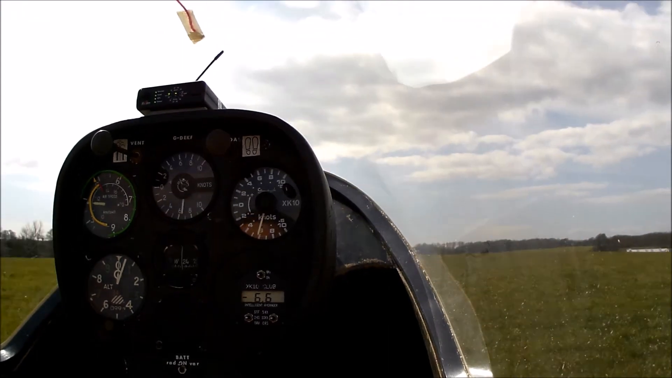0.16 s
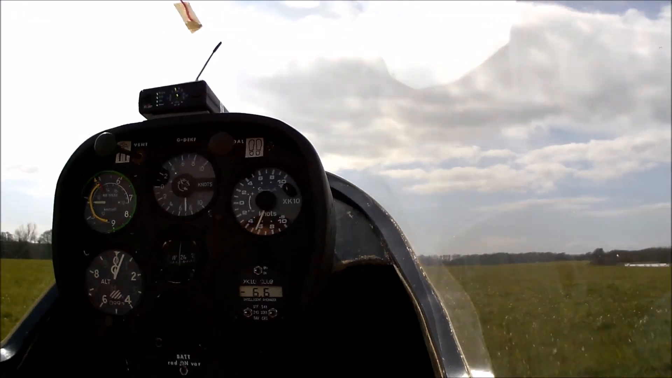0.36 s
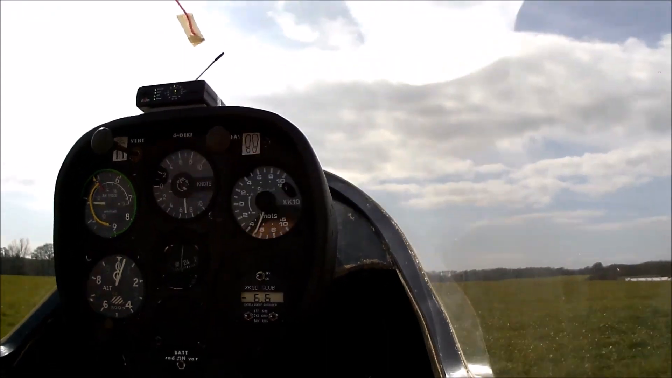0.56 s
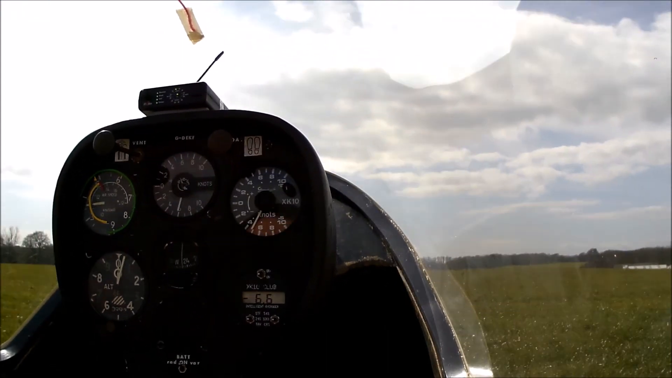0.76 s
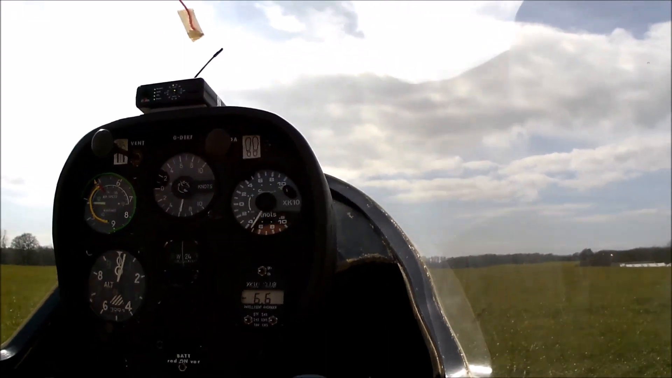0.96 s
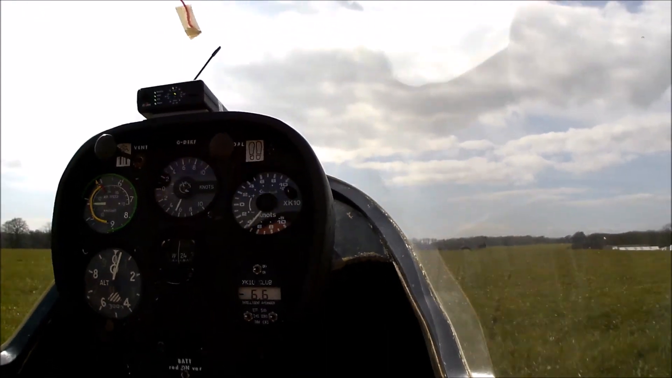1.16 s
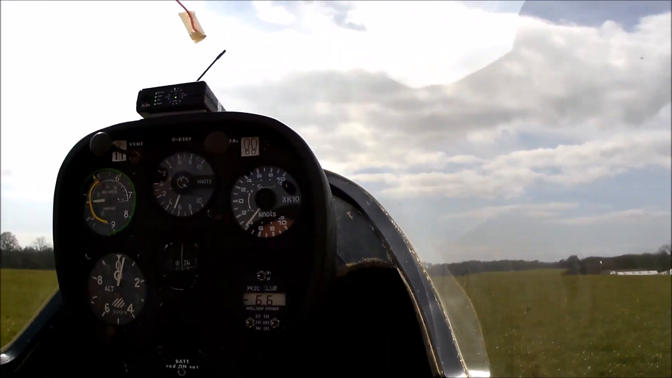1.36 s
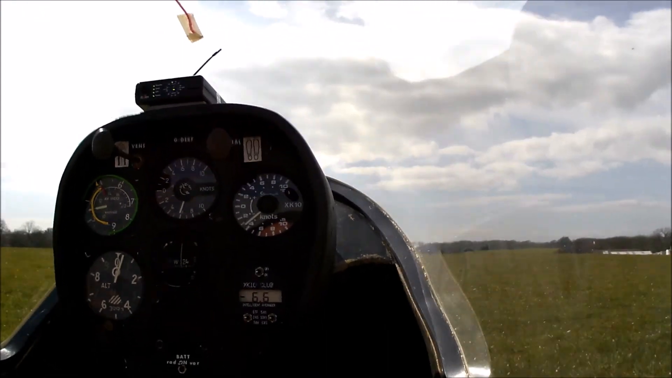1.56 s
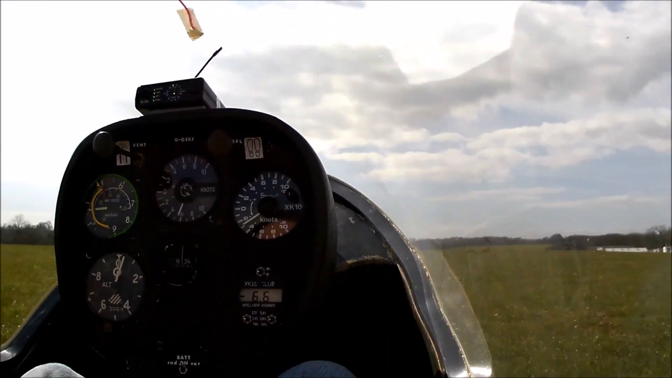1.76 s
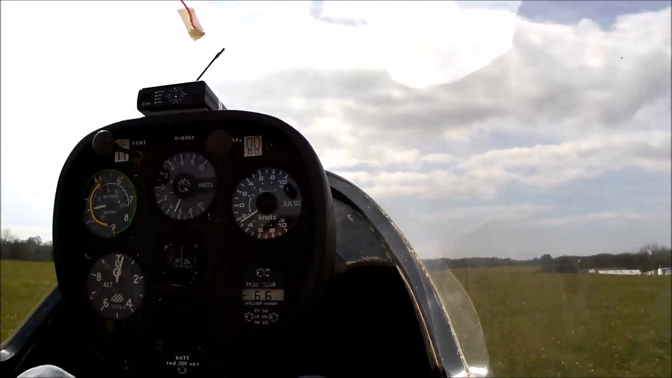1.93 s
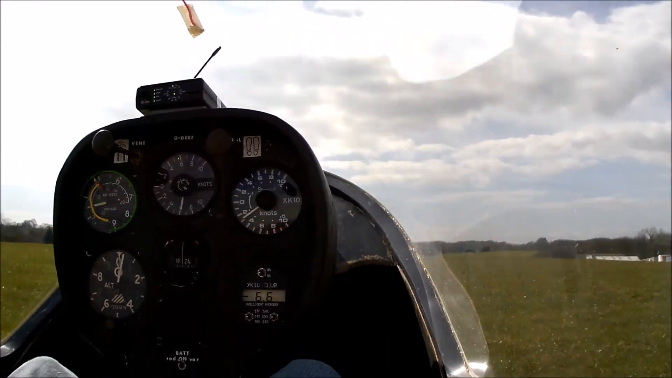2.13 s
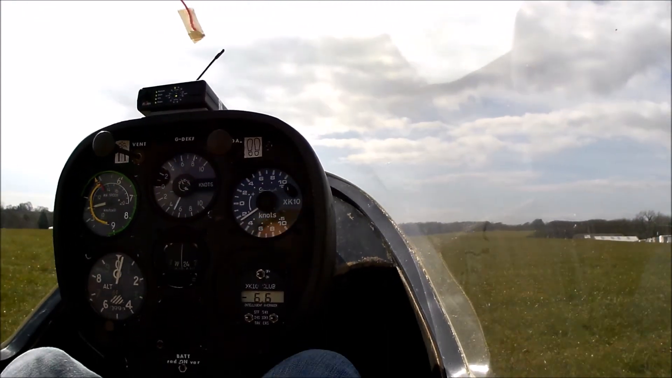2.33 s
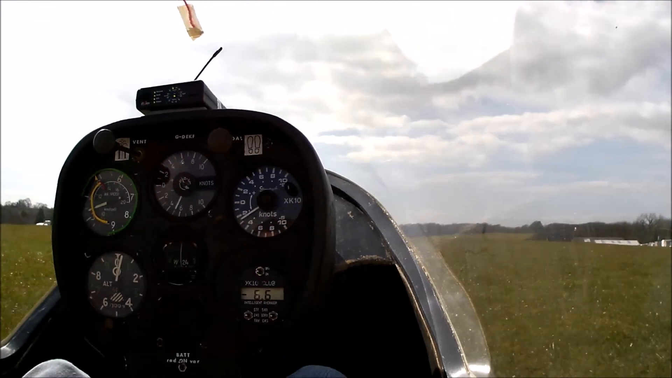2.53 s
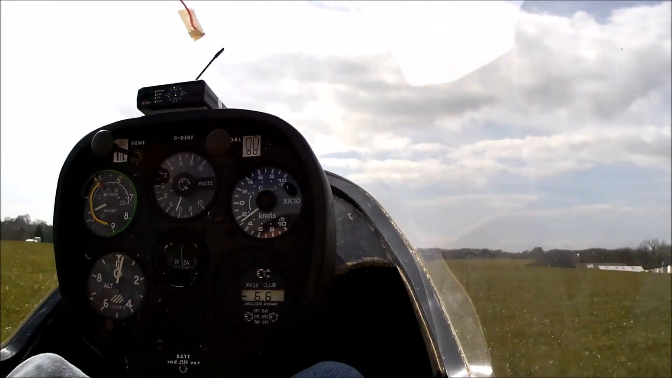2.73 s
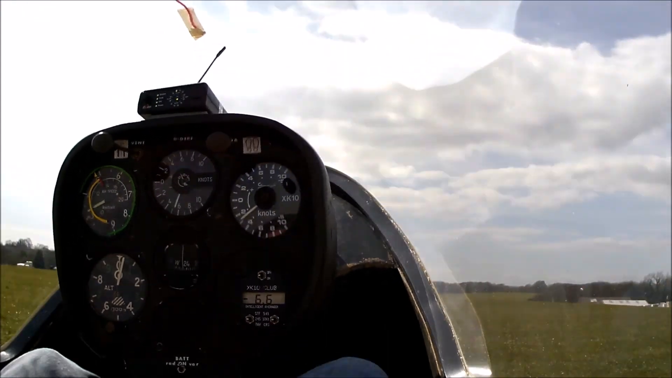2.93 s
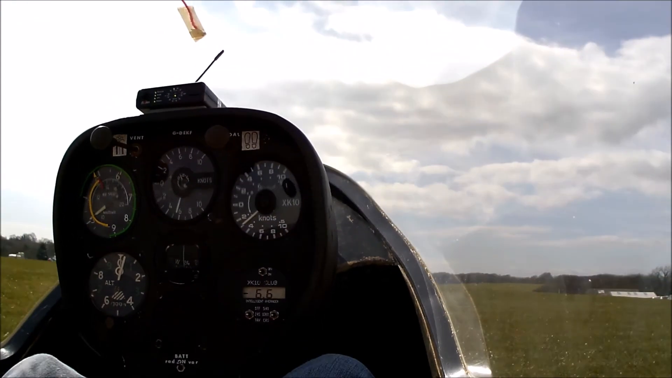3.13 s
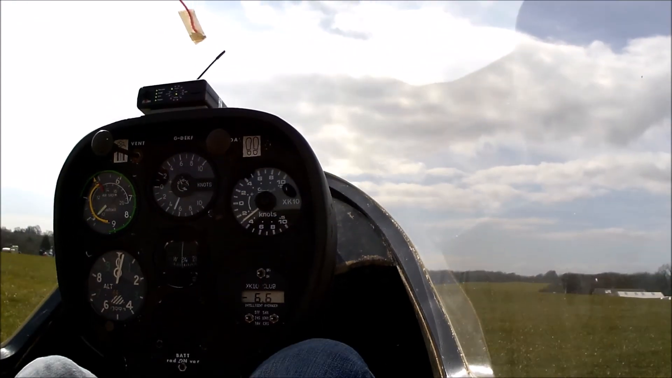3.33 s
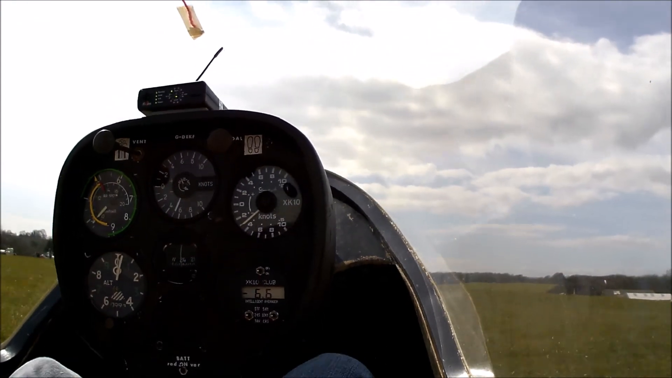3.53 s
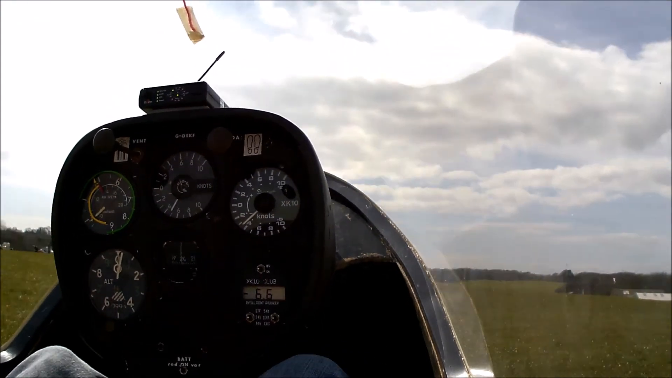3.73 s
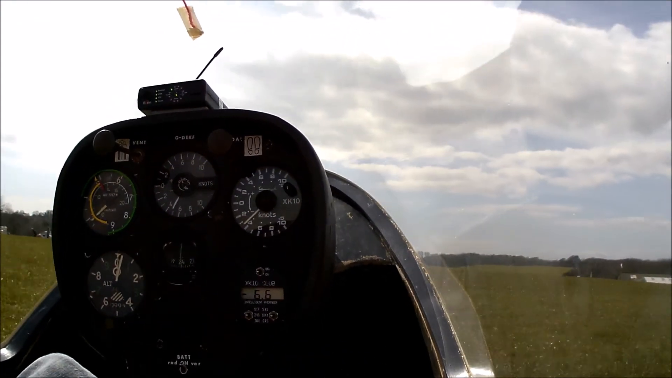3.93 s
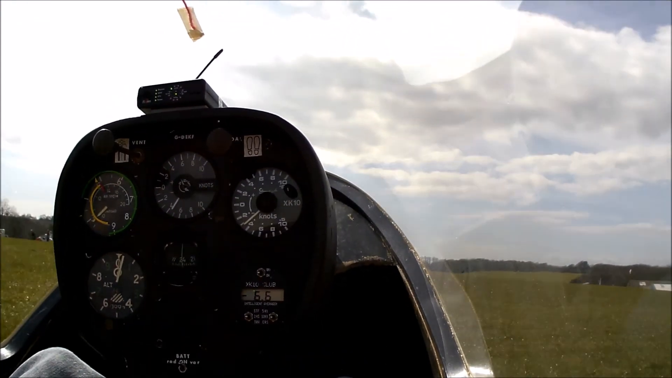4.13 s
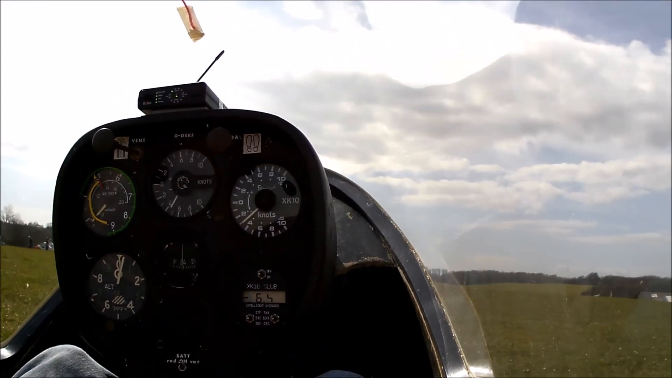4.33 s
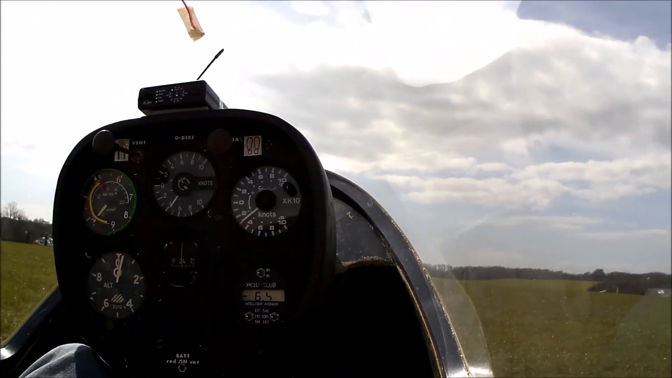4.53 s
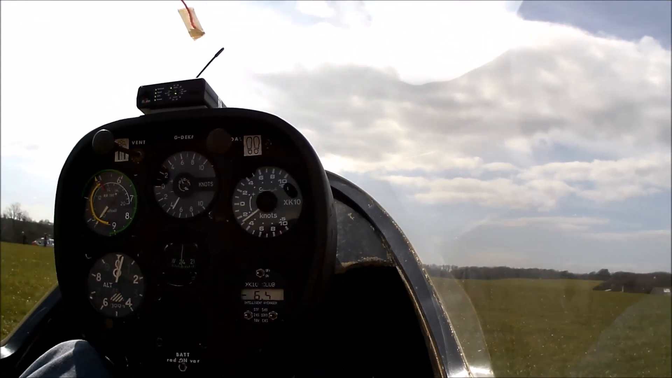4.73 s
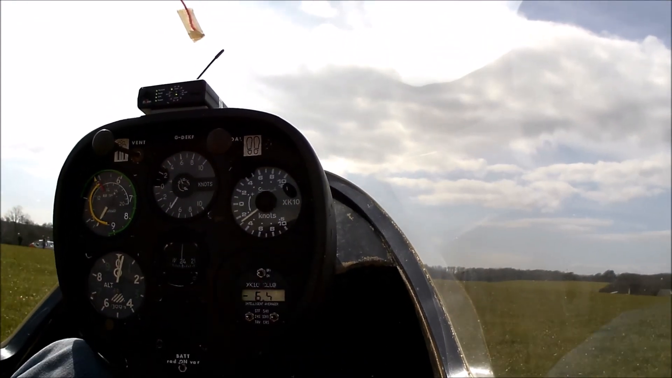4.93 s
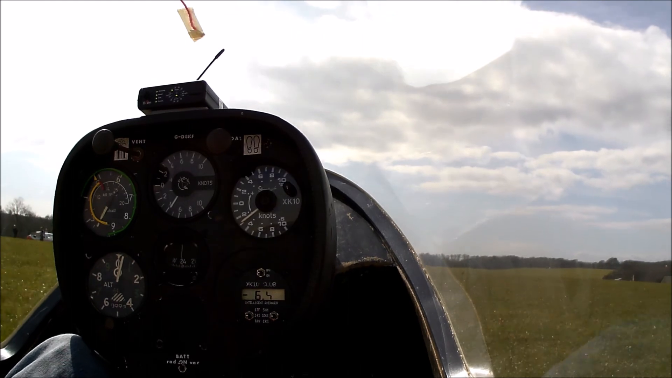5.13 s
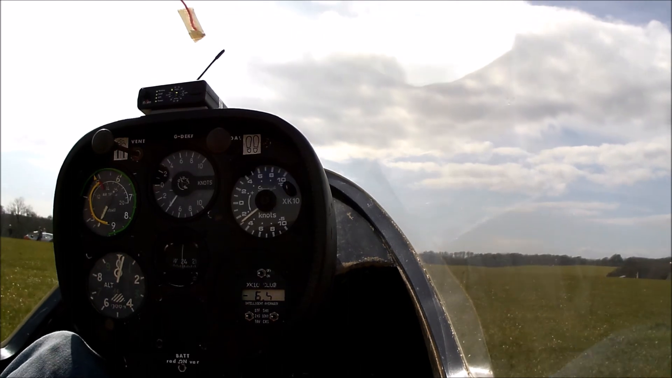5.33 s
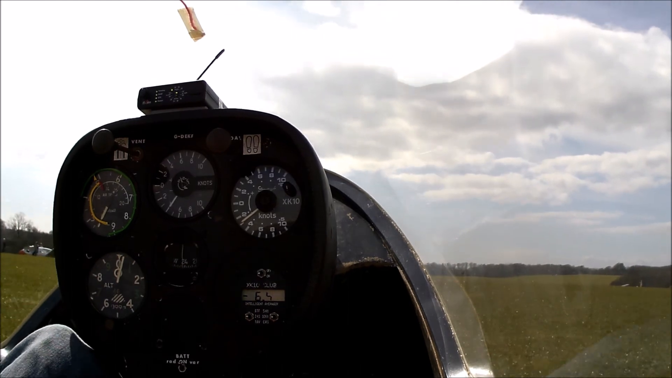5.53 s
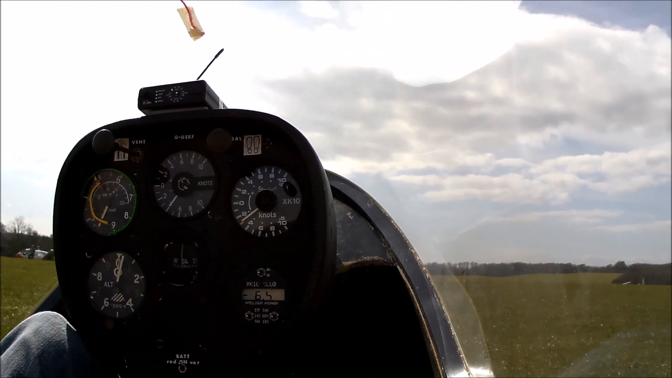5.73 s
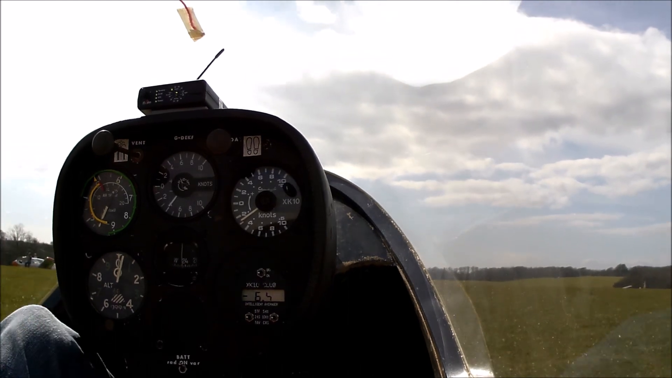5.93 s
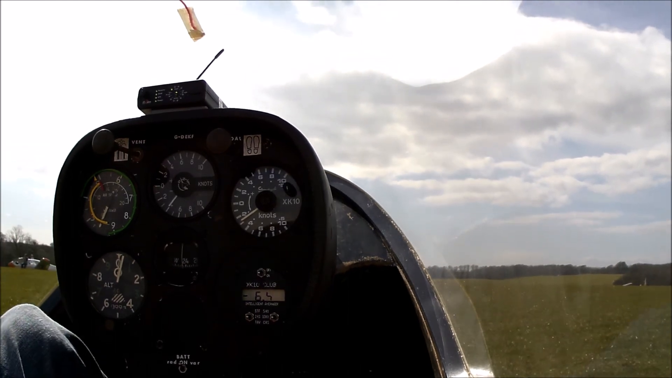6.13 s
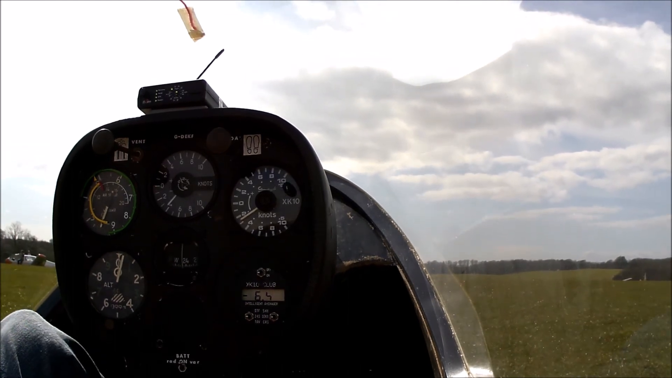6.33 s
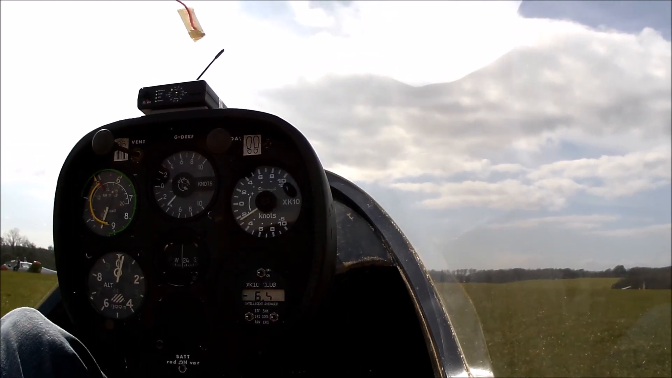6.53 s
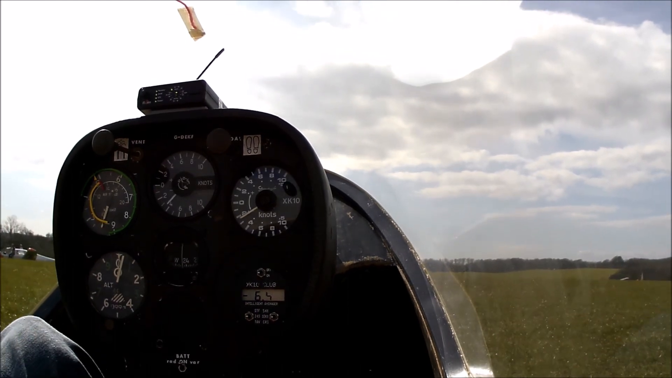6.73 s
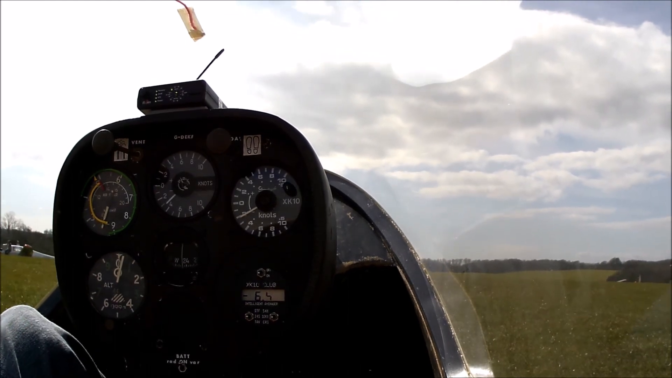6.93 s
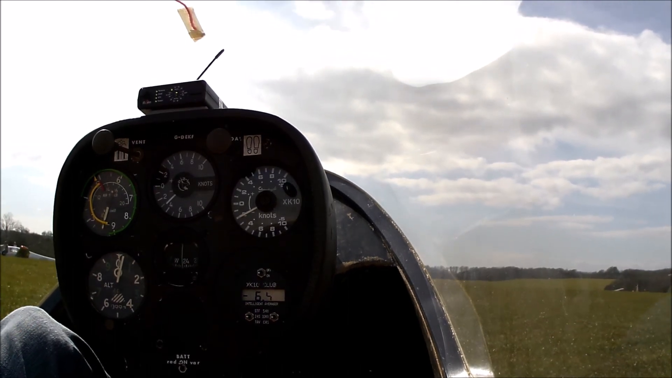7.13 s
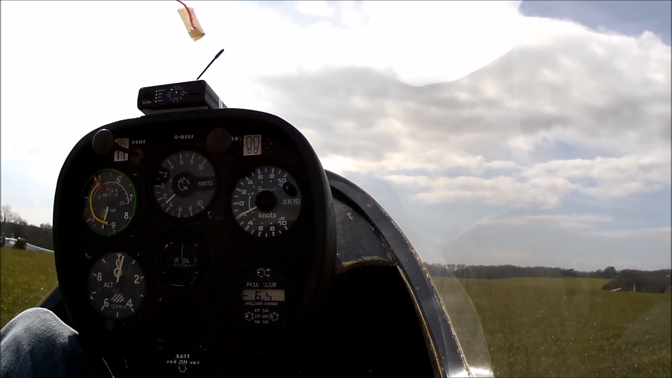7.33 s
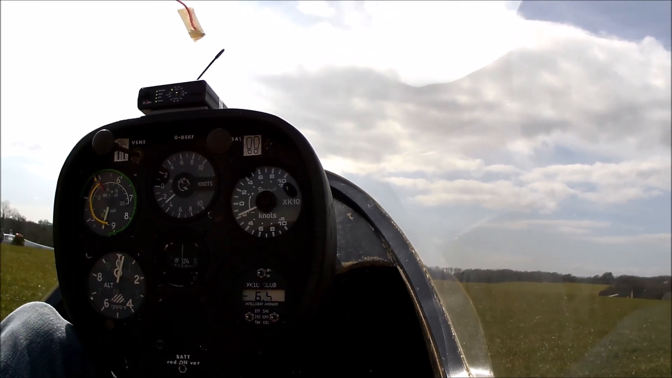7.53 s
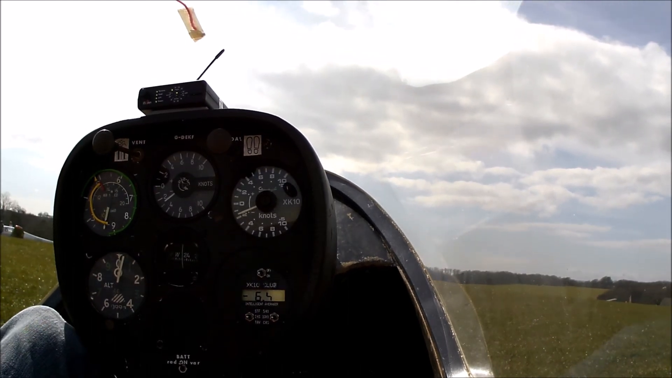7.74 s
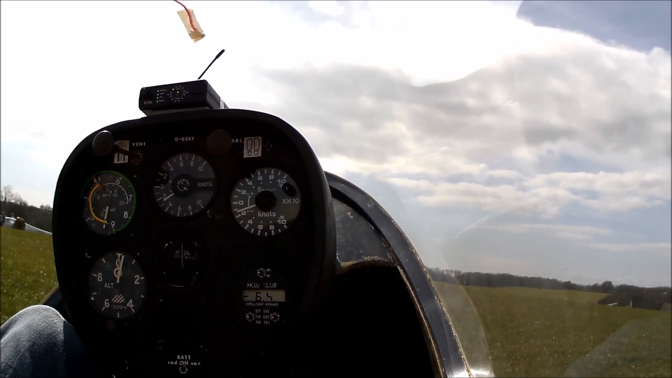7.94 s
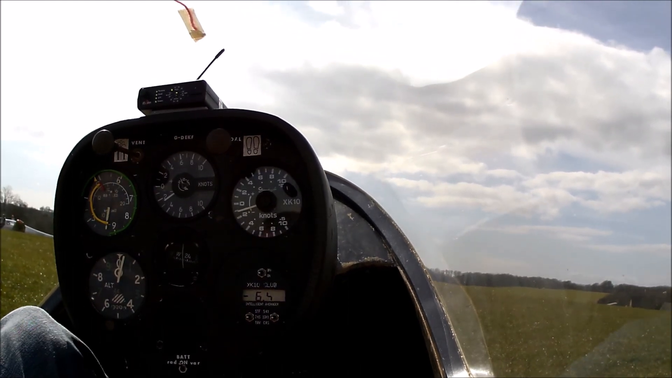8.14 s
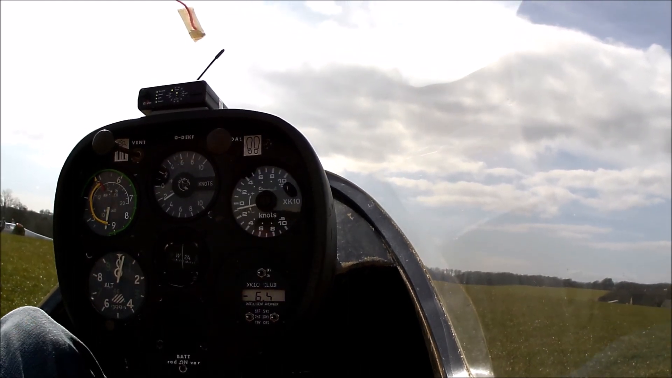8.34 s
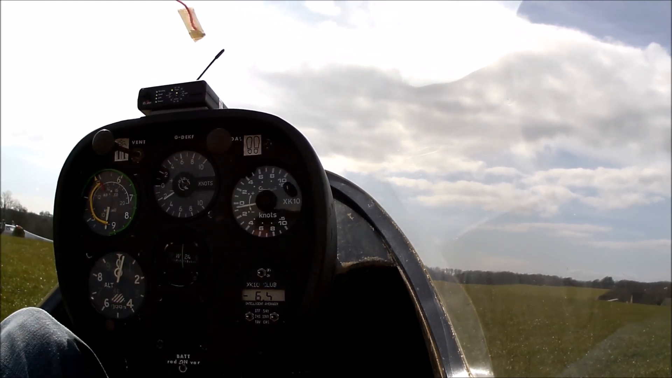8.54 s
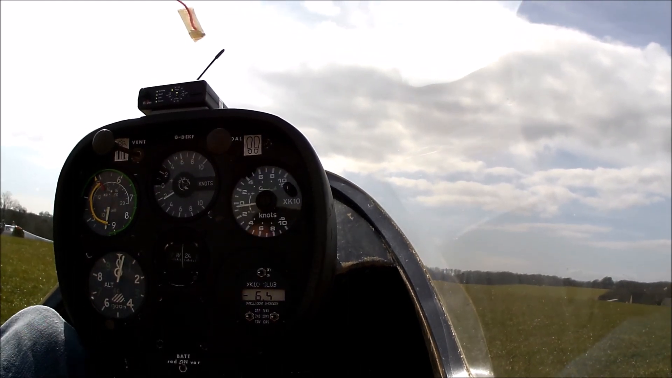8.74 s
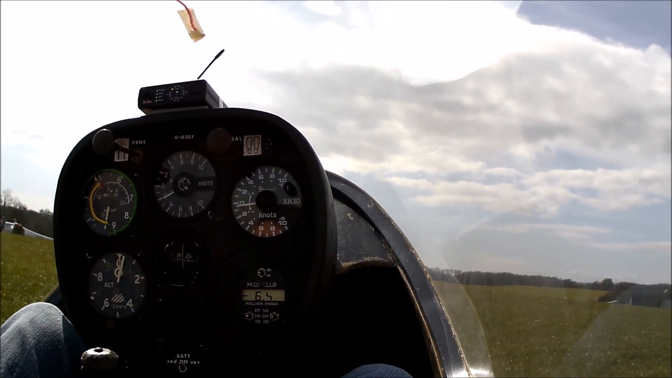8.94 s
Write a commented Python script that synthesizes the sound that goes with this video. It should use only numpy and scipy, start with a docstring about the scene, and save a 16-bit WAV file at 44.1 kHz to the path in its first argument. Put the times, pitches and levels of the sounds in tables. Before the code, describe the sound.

Heard close inside a hollow glider cockpit, a wheel rumbles deeply over bumpy grass while thin panels drum, linkages knock and small metal parts tick and clink. The roll weakens after about four seconds and dies away near seven and a half. The airframe settles with a dull thud, something slides briefly, and a hard clunk overloads the microphone at the end.

```python
"""A glider's wheel rumbles over a grass airfield, heard inside the cockpit as it rolls to a stop.
Random bumps shake the hollow shell; noise makes the hum of the tyre, the drumming panels and the swishing grass.
Loose fittings chatter and tick, linkages knock and steel parts clink, as noise bursts and dying rings.
After the stop the airframe settles with a thud, something slides, and a hard clunk overloads the microphone."""
import sys
import numpy as np
from scipy.fft import rfft, irfft, next_fast_len
from scipy.io import wavfile
from scipy.ndimage import uniform_filter1d, map_coordinates

SR = 44100
rng = np.random.default_rng(int(sys.argv[2]) if len(sys.argv) > 2 else 0)


def digitize_waveform(pressure):
    """Quantize a signal to 16-bit integers and store it at the path in sys.argv[1].

    Rows of a 2-D input are taken as channels; values are limited to [-1, 1].
    """
    field = np.atleast_2d(pressure).T
    bounded = np.clip(field, -1, 1)
    quanta = np.round(bounded * 32767).astype(np.int16)
    wavfile.write(sys.argv[1], SR, quanta)


N = 396018  # length in samples, about 9 seconds


def amp(db):
    """Turn decibels into a gain."""
    return 10 ** (np.asarray(db) / 20)


def unit(x):
    """Scale x to an average (rms) level of 1."""
    return x / np.sqrt(np.mean(x ** 2) + 1e-20)


def curves(rows):
    """Join the rows with straight lines: one curve for each column after the time."""
    times, *columns = np.vstack(rows).T
    return [np.interp(np.arange(N) / SR, times, column) for column in columns]


def wobble(rate):
    """A smooth random curve through rate random points a second."""
    points = rng.standard_normal(int(N * rate / SR) + 4)
    return map_coordinates(points, [np.arange(N) * rate / SR])


def filtered(x, response):
    """Filter x with a response given as a function of frequency."""
    size = next_fast_len(len(x) + SR // 2)
    hz = np.fft.rfftfreq(size, 1 / SR)
    return irfft(rfft(x, size) * response(hz), size)[:len(x)]


def coloured(x, points):
    """Shape x with a (Hz, dB) curve that falls away past its ends, at rms 1."""
    f, db = np.transpose(points)
    f = np.r_[f[0] / 2, f, f[-1] * 2]
    db = np.r_[-80, db, -100]
    return unit(filtered(x, lambda hz: amp(np.interp(np.log(hz + 1), np.log(f), db))))


def resonance(hz, centre, width):
    """One mode's response, which starts only after its blow and is 1 at its centre."""
    return 1j * hz * width / (centre ** 2 - hz ** 2 + 1j * hz * width)


def modes(hz, table):
    """The summed response of (Hz, width in Hz, dB) modes, with alternating signs."""
    return sum((-1) ** k * amp(db) * resonance(hz, centre, width)
               for k, (centre, width, db) in enumerate(table))


def ringing(table, t):
    """Steady (Hz, dB) tones, each with a random strength and phase, together at rms 1."""
    return unit(sum(amp(db + rng.normal(0, 3)) * np.sin(2 * np.pi * (hz * t + rng.random()))
                    for hz, db in table))


def impacts(rate, spread_db):
    """Random single-sample blows of uneven size and either sign, about rate a second."""
    size_db = spread_db * np.clip(rng.standard_normal(N), -2, 2)
    return (rng.random(N) < rate / SR) * rng.choice([-1, 1], N) * amp(size_db)


def steadied(x, span):
    """Even out the slow swells of x over span seconds."""
    size = max(int(span * SR), 2)
    power = uniform_filter1d(uniform_filter1d(x ** 2, size), size)
    return x / np.sqrt(np.abs(power) + 1e-9)


def add(track, s, sound):
    """Mix a sound into the track at time s."""
    start = max(round(s * SR), 0)
    track[start:start + len(sound)] += sound[:N - start]


def envelope(s, attack, hold, t60):
    """A gain that rises from time s, holds, then falls 60 dB every t60 seconds, down to -120 dB."""
    t = np.arange(N) / SR - s
    return np.clip(t / attack, 0, 1) * np.exp(-np.log(1000) * np.clip((t - attack - hold) / t60, 0, 2))


# The airframe drops to rest: a jolt that dies fast, then slower rocking.
SETTLE_S, SETTLE_ATTACK_S, SETTLE_HOLD_S, SETTLE_T60_S = 7.955, 0.04, 0.021, 0.63
ROCKING_DB, ROCKING_T60_S = -7, 3.1  # level against the jolt


def moments(rate):
    """Random times before the settling, about rate a second, each with two normal draws."""
    draws = rng.standard_normal((200, 3))
    times = np.cumsum(np.abs(draws[:, 0])) * np.sqrt(np.pi / 2) / rate
    return np.c_[times, draws[:, 1:]][times < SETTLE_S]


# The roll-out, dying away with the speed, as base levels for the layers.
# Each row: time in seconds, shell boom in dB, panel drumming in dB, grass swish in dB, chatter in dB.
ROLL_OUT = [(0.0, -28, -43.5, -44, -65.5), (0.5, -33, -40.5, -58.5, -65.5), (0.9, -30.0, -42.5, -55.5, -69),
            (1.5, -30.5, -41, -57.0, -68.0), (2.2, -32, -42.5, -51.0, -67), (2.6, -30.5, -44.5, -57, -73),
            (3.3, -33.5, -46.5, -58.5, -72.5), (3.75, -33.5, -46.0, -57.0, -74.5),
            (4.05, -35.5, -52.5, -63.5, -85), (4.8, -38, -54.5, -66.5, -83), (5.2, -43, -57, -69, -93.5),
            (5.9, -49, -63.0, -69.5, -88), (6.25, -49, -60.5, -67.5, -88.5),
            (6.55, -51, -66.5, -72.5, -91.5), (7.1, -58.5, -69, -72.5, -96),
            (7.52, -72.5, -81.5, -83, -100.5), (7.64, -62, -68.5, -76, -105),
            (7.93, -71.0, -82, -95, -100.0)]
# The wheel runs light over smooth ground.
# Each row: start in seconds, length in seconds, drop of the rumble in dB, drop of the chatter in dB.
# Each rumble layer, the drumming and the swish take their own share of the rumble drop.
LIGHT_STRETCHES = [(0.0, 0.3, 12.5, 15.5), (0.701, 0.075, 2.5, 2), (0.766, 0.068, 1.5, 25),
                   (1.936, 0.16, 5.5, 4), (2.438, 0.061, 5.5, 2), (2.747, 0.047, 2, 5),
                   (3.584, 0.07, 3, 10)]
LULL_EDGE_S, LULL_DRUM_SHARE, LULL_SWISH_SHARE = 0.021, 0.71, 0.99
# Jolts of the airframe, mostly from tussocks under the wheel.
# Each row: time of full strength in seconds, hold in seconds, thud in dB, boom in dB, drumming in dB.
# The boom is turned down further for the deep and upper shell sounds.
JOLTS = [(0.067, 0.027, -46, -34.5, -50), (0.299, 0.048, -27, -33, -52), (0.471, .07, -29.5, -35, -38),
         (.64, 0.02, -48, -33.5, -49), (1.7, .08, -36, -25, -44), (2.117, .07, -30.5, -33.5, -37),
         (2.268, 0.022, -37, -28.5, -51), (2.81, 0.027, -30, -33.5, -45), (2.928, 0.066, -32, -34, -39),
         (3.076, 0.021, -30, -34, -60), (3.167, 0.024, -32, -35, -38), (3.374, 0.013, -38, -29.5, -40),
         (3.503, 0.05, -30.5, -33, -44.5), (3.68, 0.074, -25.5, -38, -43.5),
         (4.313, 0.083, -36.5, -43, -44.5), (4.694, .05, -39, -34, -52), (5.044, .03, -39, -52, -60),
         (5.418, 0.087, -38, -55, -69), (5.62, 0.05, -40.5, -49, -64), (5.765, 0.077, -40, -45.5, -65),
         (5.928, 0.028, -41, -54, -72), (6.206, 0.15, -47.5, -53, -62), (6.678, 0.05, -44, -51.5, -59.5),
         (6.94, .035, -52, -57, -62), (7.0, .06, -56, -55, -74), (7.28, 0.038, -61, -65, -77),
         (8.782, 0.012, -57, -51, -59), (8.91, 0.061, -44, -37, -49)]
JOLT_ATTACK_S, JOLT_T60_S = 0.019, 0.16
# Levels when the boom is at full speed, and dB lost for each dB the boom loses.
FULL_BOOM_DB = -31
THUD_DB, THUD_FOLLOWS = -33, 0.84
DEEP_DB, DEEP_FOLLOWS = -35, 1
UPPER_DB, UPPER_FOLLOWS = -33, 1.24
# What the settling sets off; the boom is turned down further like that of the jolts.
SETTLE_THUD_DB, SETTLE_BOOM_DB, SETTLE_DRUM_DB = -36, -38, -46.5
SETTLE_RUSTLE_DB, SETTLE_CREAK_DB = -61, -82.5
SETTLE_RATTLE_DB, SETTLE_RATTLE_HOLD_S, SETTLE_RATTLE_T60_S = -82, 0.1, 0.28


def ground():
    """How hard the ground drives each part, as gains: rolling eased by lulls, jolts and the settling."""
    boom_db, drum_db, swish_db, chatter_db = curves(ROLL_OUT)
    t = np.arange(N) / SR
    ease_db, hush_db = np.zeros((2, N))
    for s, length, rumble_db, rattle_db in LIGHT_STRETCHES:
        inside = np.clip(np.minimum(t - s, s + length - t) / LULL_EDGE_S + .5, 0, 1)
        ease_db = ease_db + rumble_db * inside
        hush_db = hush_db + rattle_db * inside
    shake_db = boom_db - FULL_BOOM_DB - ease_db

    jolt = envelope(SETTLE_S, SETTLE_ATTACK_S, SETTLE_HOLD_S, SETTLE_T60_S)
    rocking = amp(ROCKING_DB) * envelope(SETTLE_S, SETTLE_ATTACK_S, SETTLE_HOLD_S, ROCKING_T60_S)
    settle = np.hypot(jolt, rocking)
    # separate shocks add as powers
    power = np.outer(amp([SETTLE_THUD_DB, SETTLE_BOOM_DB, SETTLE_DRUM_DB]) ** 2, settle ** 2)
    for s, hold, thud_db, body_db, panel_db in JOLTS:
        shape = envelope(s - JOLT_ATTACK_S, JOLT_ATTACK_S, hold, JOLT_T60_S)
        power += np.outer(amp([thud_db, body_db, panel_db]) ** 2, shape ** 2)
    thud, boom, drum = np.sqrt(power)
    rattle = amp(SETTLE_RATTLE_DB) * envelope(SETTLE_S, 0.037, SETTLE_RATTLE_HOLD_S, SETTLE_RATTLE_T60_S)

    return dict(
        thud=np.hypot(amp(THUD_DB + THUD_FOLLOWS * shake_db), thud),
        deep=np.hypot(amp(DEEP_DB + DEEP_FOLLOWS * shake_db), amp(-1.5) * boom),
        upper=np.hypot(amp(UPPER_DB + UPPER_FOLLOWS * shake_db), amp(-5) * boom),
        drum=np.hypot(amp(drum_db - LULL_DRUM_SHARE * ease_db), drum),
        swish=np.hypot(amp(swish_db - LULL_SWISH_SHARE * ease_db), amp(SETTLE_RUSTLE_DB) * settle),
        chatter=np.hypot(amp(chatter_db - hush_db), rattle + amp(SETTLE_CREAK_DB) * settle))


# Tone colour of the control linkages. Each row: frequency in Hz, level in dB.
LINKAGE_COLOUR = [(150, 2), (330, -0.5), (600, 6), (800, -3), (1300, -4), (1700, -6), (2200, -33),
                  (3500, -34), (8000, -68)]
# Tone colour of a sharp crack, also used by knocks and clunks. Each row: frequency in Hz, level in dB.
CRACK_COLOUR = [(1200, -18.5), (2000, -11), (3500, -2), (4500, -15), (7000, -23), (11000, -26),
                (16000, -32.5)]
# Tone colour of the thin panels, also used by the turf. Each row: frequency in Hz, level in dB.
PANEL_COLOUR = [(150, -26.5), (250, -5), (310, 0), (400, -3.5), (500, -9), (620, -11.5), (800, -18.5),
                (1200, -28), (1700, -33.5), (2400, -49)]
# A lever slides in its guide.
SLIDE_S, SLIDE_ATTACK_S, SLIDE_HOLD_S, SLIDE_T60_S, SLIDE_DB = 8.463, 0.023, 0.046, 0.14, -47.5


def slide():
    """A lever scrapes in its guide: dense friction noise that catches unevenly."""
    stroke = envelope(SLIDE_S, SLIDE_ATTACK_S, SLIDE_HOLD_S, SLIDE_T60_S)
    slips = rng.standard_normal(N) * amp(3.0 * wobble(rate=150))
    scrape = coloured(slips, LINKAGE_COLOUR)
    scrape += amp(-25.5) * coloured(slips, CRACK_COLOUR)
    scrape += amp(-1.5) * coloured(slips[::-1], PANEL_COLOUR)  # reversed, so it is unlike the rest
    return stroke * amp(SLIDE_DB) * scrape


# The sharpest ticks of the fittings. Each row: start in seconds, peak in dB.
SHARP_TICKS = [(.305, -48.5), (.404, -44), (.538, -42.5), (0.633, -45.5), (.65, -40.5), (1.097, -42),
               (1.228, -44.5), (1.377, -47), (1.415, -47), (1.562, -42.5), (1.804, -41), (2.301, -47),
               (2.915, -41.5), (2.95, -34.5), (3.09, -50), (3.181, -47), (3.545, -48.5), (3.738, -51),
               (4.882, -58), (5.83, -66), (8.01, -60), (8.9, -43)]
# Tone colour of a tick. Each row: frequency in Hz, level in dB.
TICK_COLOUR = [(2000, -23), (4000, -2), (7000, -1), (9500, -1.5), (13000, -4), (16000, -14.5)]
# Lighter ticks come at random: how many a second, peak in dB over the chatter, scatter in dB.
LIGHT_TICK_RATE, LIGHT_TICK_DB, LIGHT_TICK_SPREAD_DB = 12, 13, 4


def ticks(drive):
    """A fitting snaps against its neighbour: a dry, quickly dying click of noise."""
    track, t = np.zeros(N), np.arange(SR // 50) / SR
    sharp = [(s, amp(db)) for s, db in SHARP_TICKS]
    light = [(s, drive["chatter"][int(s * SR)] * amp(LIGHT_TICK_DB + LIGHT_TICK_SPREAD_DB * size))
             for s, size, _ in moments(LIGHT_TICK_RATE)]
    for s, gain in sharp + light:
        fade = amp(-60 * t / .004) + .25 * amp(-60 * t / .016)
        click = coloured(rng.standard_normal(len(t)), TICK_COLOUR) * fade
        add(track, s, gain * click / np.abs(click).max())
    return track


# Clinks of small steel parts. Each row: start in seconds, level in dB before a shared cut, which part.
STEEL_CLINKS = [(.497, -35.5, 0), (1.12, -45, 0), (1.725, -42.5, 1), (1.75, -54, 1), (1.836, -52, 1),
                (1.945, -44.5, 1), (1.966, -46, 0), (1.985, -51, 0), (2.028, -49, 0), (2.388, -56, 1),
                (2.46, -44.5, 1), (2.48, -56, 0), (3.025, -57, 1), (3.128, -51, 0), (3.364, -50, 1),
                (3.403, -41.5, 1), (3.451, -49.5, 0)]
# The two steel parts. Each row: main mode in Hz, upper mode in Hz, upper mode in dB against the main.
STEEL_PARTS = [(5160, 9100, -19), (6300, 11230, -12)]
# Fainter clinks come at random: how many a second, dB over the chatter before the cut, scatter in dB.
LIGHT_CLINK_RATE, LIGHT_CLINK_DB, LIGHT_CLINK_SPREAD_DB = 3.5, 8, 2
CLINK_CUT_DB = -6.5


def clinks(drive):
    """Small steel parts ring with a main and a weaker upper mode, then bounce twice more softly."""
    track, t = np.zeros(N), np.arange(SR // 4) / SR
    clear = [(s, amp(db), part) for s, db, part in STEEL_CLINKS]
    light = [(s, drive["chatter"][int(s * SR)] * amp(LIGHT_CLINK_DB + LIGHT_CLINK_SPREAD_DB * size),
              int(pick > 0))
             for s, size, pick in moments(LIGHT_CLINK_RATE) if drive["chatter"][int(s * SR)] > amp(-80)]
    for s, gain, part in clear + light:
        main_hz, upper_hz, upper_db = STEEL_PARTS[round(part)]
        main_hz = main_hz * (1 + .007 * rng.standard_normal())
        upper_hz = upper_hz * (1 + 0.005 * rng.standard_normal())
        main = np.sin(2 * np.pi * main_hz * t) * amp(-60 * t / .07)
        upper = amp(upper_db) * np.sin(2 * np.pi * upper_hz * t) * amp(-60 * t / 0.095)
        ring = gain * amp(CLINK_CUT_DB) * (main + upper) * (1 - np.exp(-t / 0.0002))
        add(track, s, ring)
        for delay in rng.uniform(0.0055, 0.021, size=2):
            add(track, s + delay, amp(-23.5) * ring)
    return track


# Control linkages knocking in their play.
# Each row: start in seconds, level in dB before a shared cut, main pitch in Hz, body in dB, treble in dB.
LINKAGE_KNOCKS = [(.463, -32.5, 885, -1.5, -24), (.517, -36.5, 1140, 4.5, -20), (.603, -40, 926, 5, -12),
                  (.649, -37, 1346, 6, -10), (1.26, -36.5, 840, 2.5, -15), (1.704, -30, 1320, 0.5, -17),
                  (1.787, -37.5, 1420, 1, -11.5), (1.865, -23, 1340, -4, -24),
                  (1.951, -30, 1250, -4.5, -31), (2.123, -26.5, 1080, -4, -31), (2.169, -32, 1000, 1, -28),
                  (2.384, -31, 1040, -4, -38), (2.593, -33, 1100, 1.5, -33),
                  (2.822, -30.5, 1080, -1.5, -32.5), (2.925, -34.5, 870, -1, -22.5),
                  (2.951, -33, 1190, -0.5, -15), (3.013, -33, 1320, -8, -36),
                  (3.318, -30.5, 1330, -4.5, -33), (3.364, -38, 1070, 0.5, -25),
                  (3.501, -38, 1270, 1.5, -18), (3.608, -48.5, 1250, 4.5, -9), (3.911, -29, 1130, -3, -28),
                  (4.316, -36.5, 925, -1.5, -21.5), (4.371, -45.5, 1240, 3.5, -32),
                  (4.708, -45, 1100, 0, -41), (4.772, -38, 1266, 3, -41), (6.081, -49, 700, -1, -30),
                  (6.675, -43.5, 700, -11.5, -42), (7.303, -57.5, 1130, 0, -26),
                  (7.408, -64, 1300, -1, -26), (7.665, -57, 1260, -6, -32), (7.966, -44, 1000, -3, -37),
                  (8.036, -43.5, 1110, 0.5, -25), (8.089, -47, 840, 4, -17.5),
                  (8.25, -52.5, 1220, 0.5, -15), (8.72, -54, 1290, 2.5, -34), (8.76, -35.5, 935, -18, -54),
                  (8.901, -20.5, 1100, -4, -27)]
# The cockpit's panels as the knocks ring them. Each row: frequency in Hz, level in dB.
PANEL_RINGS = [(580, 1), (945, -4.5), (1055, -6), (1258, -3.5), (1400, -9.5), (1720, -12)]
# The metal push rods' own ring. Each row: frequency in Hz, level in dB.
ROD_RINGS = [(2470, -5), (2790, -4), (3050, -2), (3550, -1), (3820, 0)]
# Lighter knocks come at random: how many a second, dB over the swish before the cut, scatter in dB.
LIGHT_KNOCK_RATE, LIGHT_KNOCK_DB, LIGHT_KNOCK_SPREAD_DB = 3, 7.5, 0.5
LIGHT_KNOCK_HZ, LIGHT_BODY_DB, LIGHT_TREBLE_DB = 1205, -1.5, -22  # middle pitch, body, treble
KNOCK_CUT_DB, KNOCK_T60_S, KNOCK_ATTACK_S = -4.5, .1, 0.00027
PANEL_RING_DB, PANEL_RING_T60_S = -6, .14  # level against the body
ROD_RING_DB, ROD_RING_T60_S = -4, .13  # level against the crack


def knocks(drive):
    """Each knock is a sharp crack and a short ring that scatters round the cockpit."""
    track, t = np.zeros(N), np.arange(SR // 4) / SR
    heavy = [(s, amp(db), pitch_hz, body_db, treble_db)
             for s, db, pitch_hz, body_db, treble_db in LINKAGE_KNOCKS]
    light = [(s, drive["swish"][int(s * SR)] * amp(LIGHT_KNOCK_DB + LIGHT_KNOCK_SPREAD_DB * size),
              LIGHT_KNOCK_HZ * np.exp(0.11 * detune), LIGHT_BODY_DB, LIGHT_TREBLE_DB)
             for s, size, detune in moments(LIGHT_KNOCK_RATE) if drive["chatter"][int(s * SR)] > amp(-85)]
    for s, gain, pitch_hz, body_db, treble_db in heavy + light:
        ring_noise, body_noise, crack_noise = rng.standard_normal((3, len(t)))
        ring = unit(filtered(ring_noise, lambda hz: resonance(hz, pitch_hz, 297) ** 2))
        ring = steadied(ring, span=.004)
        body = amp(body_db) * coloured(body_noise, LINKAGE_COLOUR)
        scatter = amp(-1.0) * (0.47 * ring + body) * amp(-60 * t / KNOCK_T60_S)
        panels = amp(body_db + PANEL_RING_DB) * ringing(PANEL_RINGS, t) * amp(-60 * t / PANEL_RING_T60_S)
        # the struck part itself: a very short tone
        direct = 0.82 * np.sin(2 * np.pi * pitch_hz * t) * amp(-60 * t / 0.03)
        rod = amp(ROD_RING_DB) * ringing(ROD_RINGS, t) * amp(-60 * t / ROD_RING_T60_S)
        crack = amp(treble_db) * (coloured(crack_noise, CRACK_COLOUR) * amp(-60 * t / 0.08) + rod)
        knock = (direct + scatter + panels + crack) * (1 - np.exp(-t / KNOCK_ATTACK_S))
        add(track, s, gain * amp(KNOCK_CUT_DB) * knock)
    return track


# Modes of the hollow shell. Each row: frequency in Hz, width in Hz, level in dB.
SHELL_MODES = [(81, 28, -9.5), (112, 14.5, 3), (148.3, 24, -2.5), (174, 16.5, 1.5), (217.4, 34, 1.5),
               (299, 21, -1), (411, 103, -7.5), (584, 30, -5.5), (643, 27, -3.5), (790, 150, -12.5),
               (938, 110, -14.5), (1028, 70, -15), (1306, 28, -13.5), (1490, 130, -23), (1780, 610, -35.5)]


def shell(hz, contact_hz):
    """The shell's answer to a contact; a softer one, with lower contact_hz, reaches fewer high modes."""
    return modes(hz, SHELL_MODES) / (1 + 1j * hz / contact_hz) ** 2


# Blows on the shell. Each row: start in seconds, level in dB, contact hardness in Hz,
# crack in dB against the ring, time in seconds for the ring to fall 60 dB.
SHELL_BLOWS = [(1.029, -30.5, 900, -25.5, .093), (2.108, -32.5, 1100, -42, 0.18),
               (2.168, -31, 1300, -30, 0.15), (2.951, -30, 1500, -32, 0.076),
               (4.945, -41.5, 597, -40, 0.12), (6.085, -52, 1200, -45, .12), (6.458, -52.5, 490, -36, .12),
               (6.686, -44, 1900, -52, .17), (7.964, -41, 296, -49, 0.69), (8.763, -46, 1400, -47, 0.61),
               (8.8985, -22, 1500, -23.5, 0.45)]


def clunks():
    """A heavy part hits its stop and judders: a blow and fading noise ring the shell's modes."""
    track, t = np.zeros(N), np.arange(SR // 2) / SR
    for s, db, contact_hz, crack_db, t60 in SHELL_BLOWS:
        judder, crack_noise = rng.standard_normal((2, len(t)))
        force = 0.052 * judder * amp(-60 * t / 0.26)
        force[0] += 1  # the blow itself
        # a small part barely moves the deepest modes
        ring = filtered(force, lambda hz: shell(hz, contact_hz) * 1j * hz / (80 + 1j * hz))
        ring = steadied(unit(ring), span=.025) * amp(-60 * t / t60)
        crack = amp(crack_db) * coloured(crack_noise, CRACK_COLOUR) * amp(-60 * t / 0.13)
        add(track, s, amp(db) * (ring + crack))
    return track


# Tone colour of the rasping fittings. Each row: frequency in Hz, level in dB.
FITTING_COLOUR = [(1500, -15), (2500, 3.5), (3500, 8.5), (4400, 0), (6000, 1), (8000, 2), (10000, -14),
                  (13500, -5), (16000, -31)]
# The loose fittings' own rings. Each row: frequency in Hz, width in Hz, level in dB.
FITTING_RINGS = [(5020, 270, 5), (6300, 220, -12.5), (6920, 200, 2), (8400, 300, -5), (9480, 400, 0),
                 (10520, 370, -0.5), (11500, 150, -13.5), (13200, 630, -15)]


def chatter(vibration, drive):
    """Loose fittings rasp and jingle in short bursts at the crests of the shell's swing."""
    swing = steadied(unit(vibration), span=0.14)
    contact = .25 + np.clip(swing - .6, 0, 1.2) + .3 * np.clip(-swing - .8, 0, 1.2)
    grit = rng.standard_normal(N) + .45 * unit(impacts(rate=900, spread_db=4))
    rasp = coloured(grit * contact * amp(4 * wobble(rate=150)), FITTING_COLOUR)
    jingle = np.zeros(N)
    for centre, width, db in FITTING_RINGS:
        taps = impacts(rate=320, spread_db=4) * contact
        jingle += amp(db) * filtered(taps, lambda hz: resonance(hz, centre, width))
    mix = steadied(rasp + amp(-4.0) * unit(jingle), span=0.059)
    return drive["chatter"] * amp(0.7 + 3.2 * wobble(rate=19)) * mix


# Tone colour of the grass. Each row: frequency in Hz, level in dB.
GRASS_COLOUR = [(400, -3.5), (700, 0.5), (950, 1.5), (1300, 5.5), (1700, -1.5), (2000, -12), (2350, -24),
                (2900, -20), (3500, -13), (4300, -26.5), (7000, -32.5), (11000, -62), (16000, -41)]


def turf(drive):
    """Small bumps drum on the thin panels while grass brushes the belly, both as shaped random blows."""
    drum = steadied(coloured(impacts(rate=600, spread_db=4.5), PANEL_COLOUR), span=.05)
    drum = drum * amp(-0.42 + 1.68 * wobble(rate=25))
    stalks = unit(impacts(rate=500, spread_db=1.5)) + 0.94 * rng.standard_normal(N)
    swish = coloured(stalks, GRASS_COLOUR) * amp(0.28 + 1.2 * wobble(rate=31))
    return drive["drum"] * drum + drive["swish"] * swish


# Tone colour of the wheel's thud. Each row: frequency in Hz, level in dB.
WHEEL_COLOUR = [(10, -21.5), (20, -8.5), (30, -5.5), (41, -3), (55, -7), (70, -7.5), (90, -14),
                (140, -46.5)]


def rumble(drive):
    """Tussocks bounce the wheel, set the tyre humming and boom in the shell."""
    thud = steadied(coloured(impacts(rate=300, spread_db=6.5), WHEEL_COLOUR), span=0.079)
    boom = filtered(impacts(rate=400, spread_db=2.5), lambda hz: shell(hz, contact_hz=257))
    deep = coloured(boom, [(65, -4.5), (90, 2), (125, -1), (150, -15.5), (220, -46.0)])
    deep = steadied(deep, span=0.076)
    upper = coloured(boom, [(115, -21.5), (145, 3.5), (172, -4.0), (200, -2.5), (230, -3),
                            (290, -8.0), (500, -36.5)])
    tyre_hz = 165 + 7 * wobble(rate=4)  # the tyre's note wanders
    phase = 2 * np.pi * np.cumsum(tyre_hz) / SR
    # two random strengths make the hum swell, fade and shift its phase
    hum = unit(wobble(rate=24) * np.sin(phase) + wobble(rate=22) * np.cos(phase))
    upper = steadied(upper + 1.2 * hum, span=.09)
    return drive["thud"] * thud + drive["deep"] * deep + drive["upper"] * upper


def scene():
    """Add up all the sounds inside the cockpit."""
    drive = ground()
    vibration = rumble(drive)
    rolling = vibration + turf(drive) + chatter(vibration, drive)
    contacts = slide() + clunks() + clinks(drive) + knocks(drive) + ticks(drive)
    return (rolling + contacts)[None]


# Tone colour of the microphone's hiss. Each row: frequency in Hz, level in dB.
HISS_COLOUR = [(30, 25), (300, 14.7), (2000, 5.6), (5000, 6.1), (9000, 8.9), (15500, 5.8)]
TOP_HZ = 15800


def record(dry):
    """The microphone adds faint hiss, rounds off loud peaks and keeps only what lies below TOP_HZ."""
    x = dry[0] + amp(-87) * coloured(rng.standard_normal(N), HISS_COLOUR)
    ceiling = amp(-19.6)
    x = x / (1 + np.abs(x / ceiling) ** 6) ** (1 / 6)
    return filtered(x, lambda hz: hz < TOP_HZ)[None]


dry = scene()
out = record(dry)
digitize_waveform(out)
```